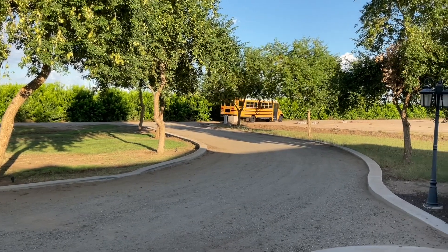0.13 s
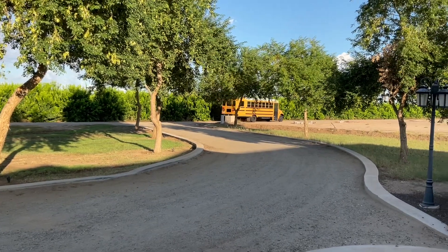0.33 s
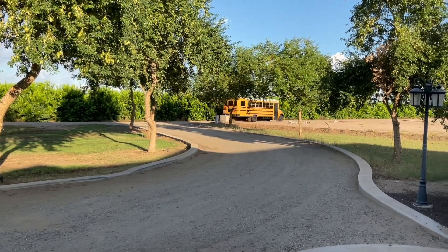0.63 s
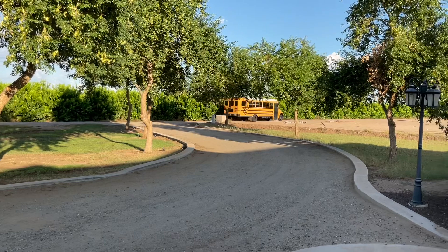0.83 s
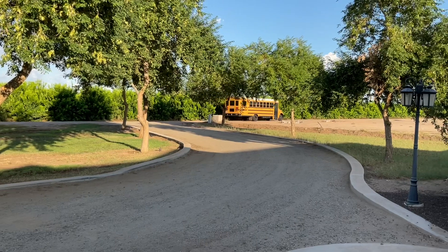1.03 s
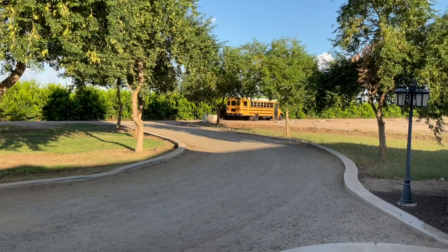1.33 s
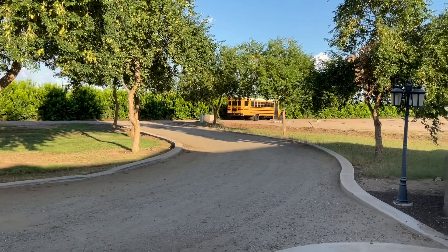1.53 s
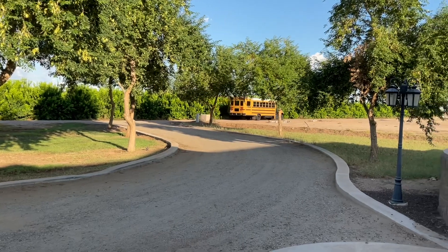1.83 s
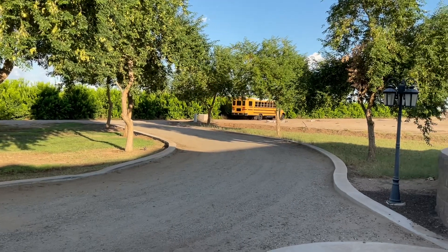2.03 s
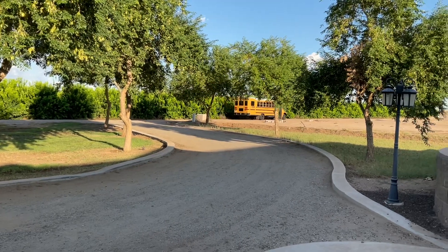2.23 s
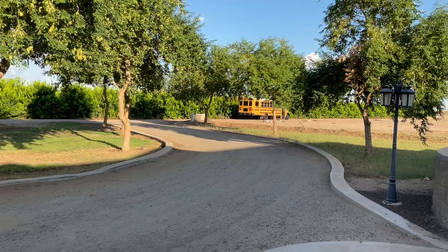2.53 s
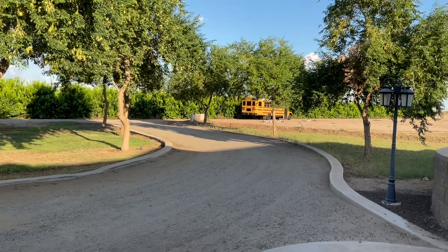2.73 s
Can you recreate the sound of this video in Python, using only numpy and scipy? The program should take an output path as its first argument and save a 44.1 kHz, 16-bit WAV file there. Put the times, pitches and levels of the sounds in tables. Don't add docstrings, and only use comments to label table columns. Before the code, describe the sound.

A diesel bus about sixty metres away drones with a deep, steady exhaust hum and soft pulsing fan and valve hiss. Pitch creeps up slightly until about 1 s, while the boom dips, then swells again around 1.4-1.7 s. Near 1.8 s the throttle lifts; pitch slides down by a third until 2.5 s and fades. A very faint high whistle falls too. Tiny rattling ticks and low outdoor rumble remain.

```python
import sys
import numpy as np
from scipy import signal
from scipy.fft import rfft, irfft, next_fast_len
from scipy.io import wavfile
from scipy.ndimage import uniform_filter1d

SR = 44100
rng = np.random.default_rng(int(sys.argv[2]) if len(sys.argv) > 2 else 0)


def field_ratio(decibels):
    return 10 ** (np.asarray(decibels, dtype=float) / 20)


def to_wav(sig):
    pcm = np.clip(np.atleast_2d(sig), -1, 1) * 32767
    pcm = np.round(pcm).astype(np.int16)
    wavfile.write(sys.argv[1], SR, pcm.T)


N = 127008

# time in seconds, firing rate in Hz, exhaust boom in dB,
# gain from distance in dB.
ENGINE_RUN = [(0, 75.55, -24.5, 1), (.2, 74.93, -26.5, 1), (.34, 76.42, -25.5, 0.5),
              (.62, 76.9, -32.5, 1.5), (.76, 78.48, -32, 1), (1.04, 79.4, -40, 0), (1.18, 78.1, -36.5, 0.5),
              (1.36, 77.6, -29, -1), (1.6, 75.57, -28, -2), (1.78, 75.5, -29, -2), (1.95, 68.34, -37, -2.5),
              (2.2, 59.14, -39.5, -4), (2.45, 51.2, -40, -4), (2.6, 50.56, -59.5, -6),
              (2.88, 50, -48, -4.5)]
# multiple of the firing rate, level in dB, loudest moment in seconds,
# spread around it in seconds.
ENGINE_ORDERS = [(1.5, -42.5, 1.6, 1.17), (2, -51, 0.55, 2.8), (2.5, -53, 0.23, 0.25),
                 (3.33, -51, 0.72, 0.38), (4.33, -57, 0.28, 0.56), (5.3, -48.5, 0.06, 0.11),
                 (8, -52.5, 1.459, 0.41), (8.05, -53.5, 0.82, 0.54), (8.5, -57.5, 0.1, 0.18),
                 (9.4, -50.5, 0.99, 0.33), (14.4, -56.5, 1.1, 0.17), (3.0, -51, 1.4, 0.15)]
# time in seconds, pitch in Hz, level in dB.
TURBO_WHISTLE = [
    (0, 12700, -81),
    (.55, 12900, -80),
    (.95, 13170, -81),
    (1.18, 13170, -81),
    (1.75, 11450, -77),
    (1.96, 10950, -83),
    (2.3, 9900, -89),
    (2.45, 9600, -110),
    (2.88, 9500, -120),
]
# frequency in Hz, density in dB per Hz.
HISS_COLOUR = [(300, -17), (700, 1.5), (1450, -6.5), (2500, -6.5), (4700, -15), (6900, -13), (8300, -30),
               (13000, -44)]
# frequency in Hz, width in Hz, level in dB.
COVER_RINGS = [(1145, 200, -59), (1870, 210, -65.5), (2927, 600, -59), (4200, 690, -63.5), (5700, 330, -66),
               (7000, 1300, -70.5)]
# frequency in Hz, density in dB per Hz.
RUMBLE_COLOUR = [(25, -34.5), (55, -8), (90, -5.5), (130, -6.5), (220, -14.5), (370, -14.5), (700, -27.5),
                 (9000, -89)]
# frequency in Hz, width in Hz, level in dB.
DISTANT_HUM = [(95.6, 5.5, -37.5), (118.8, 5.8, -50), (81.6, 26, -40), (179.5, 8.6, -53), (326, 49, -56.5),
               (408.8, 12, -63.5)]
# start in seconds, level in dB, centre in Hz, length in seconds.
LOOSE_TICKS = [(.5, -62, 6500, .01), (0.734, -58, 5700, .008), (1.34, -55, 5170, .008),
               (1.406, -52, 7000, 0.021), (1.67, -56.5, 4560, .015), (1.834, -62.5, 4200, .008),
               (1.9, -59.5, 3520, .012), (1.975, -71.5, 5060, 0.015), (2.455, -55.5, 6000, .015),
               (2.454, -77, 11160, 0.009), (2.623, -56.5, 7300, 0.013), (2.733, -64.5, 2540, 0.014)]
# frequency in Hz, lead of the left port in radians.
PORT_LEAD = [(170, 0), (310, -.45), (950, .5), (1300, -.6), (2420, -3.2), (3400, -6.2), (4150, -6.3),
             (12000, -11.3)]
# frequency in Hz, share of sound reaching both alike from 0 to 1.
PORT_LIKENESS = [(105, .999), (170, .96), (320, .6), (440, .8), (600, .55), (1200, .65), (1800, .93),
                 (7000, .9)]


def table(rows, col, at, log=False):
    r = np.array(rows, float)
    if log:
        return np.interp(np.log(at + 1), np.log(r[:, 0]), r[:, col])
    return np.interp(at, r[:, 0], r[:, col])


def level(x, db):
    return x * field_ratio(db) / np.sqrt(np.mean(x ** 2))


def walk(rate_hz):
    hold = int(SR / rate_hz)
    steps = rng.standard_normal(400)[np.arange(N) // hold % 400]
    return 1.3 * uniform_filter1d(uniform_filter1d(steps, hold), hold)


def band(hz, width):
    f = np.fft.rfftfreq(N, 1 / SR)
    resonance = 1 / (1 + ((f - hz) / width * 2) ** 2)
    return level(irfft(rfft(rng.standard_normal(N)) * resonance, N), 0)


def noise(colour, swell_db, flicker_db, air_db=0):
    f = np.fft.rfftfreq(N, 1 / SR)
    swell = walk(5.77)
    spectrum = rfft(rng.standard_normal(N)) * field_ratio(table(colour, 1, f, True))
    octave = np.log2(f / 30 + 1e-9)
    out = 0
    for k in range(10):
        part = irfft(spectrum * np.clip(1 - abs(octave - k), 0, 1), N)
        air = air_db * (k / 9) ** 6
        out = out + part * field_ratio(swell_db * swell + flicker_db * walk(9.0) + air)
    return level(out, 0)


def exhaust_boom(t, turns):
    sway_db = 0.74 * walk(21.0)
    return np.sqrt(2) * field_ratio(table(ENGINE_RUN, 2, t) + sway_db) * np.sin(2 * np.pi * turns)


def weaker_orders(t, turns):
    lift_off_s, ramp_s, drop_db = 1.75, 0.3, -9
    total = 0
    for multiple, db, loudest, spread in ENGINE_ORDERS:
        sway = field_ratio(db + 0.5 * walk(4.6))
        phase = multiple * turns + rng.random() + 0.18 * walk(9.0)
        heard = np.exp(-((t - loudest) / spread) ** 2)
        total = total + np.sqrt(2) * sway * np.sin(2 * np.pi * phase) * heard
    return total * field_ratio(drop_db * np.clip((t - lift_off_s) / ramp_s, 0, 1))


def clatter_hiss(t, turns):
    depth, sharpness = 0.26, 6.6
    cycle = turns / 6 + 0.15 * walk(3.0)
    pulse = 1 + depth * (0.5 + 0.5 * np.cos(2 * np.pi * cycle)) ** sharpness
    air_db = 0.9 * table(ENGINE_RUN, 3, t)
    hiss = level(noise(HISS_COLOUR, swell_db=0.44, flicker_db=0.34, air_db=air_db) * pulse, -45)
    covers = sum(field_ratio(db + 2.5 * walk(18.0)) * band(hz, width) for hz, width, db in COVER_RINGS)
    return hiss + pulse * covers


def engine(t):
    turns = np.cumsum(table(ENGINE_RUN, 1, t)) / SR
    far = field_ratio(table(ENGINE_RUN, 3, t))
    return exhaust_boom(t, turns) + far * (weaker_orders(t, turns) + clatter_hiss(t, turns))


def turbo(t):
    rough = band(0, 220)
    turns = np.cumsum(table(TURBO_WHISTLE, 1, t)) / SR
    return np.sqrt(2) * field_ratio(table(TURBO_WHISTLE, 2, t)) * rough * np.cos(2 * np.pi * turns)


def surroundings(t):
    rumble = level(noise(RUMBLE_COLOUR, swell_db=0.3, flicker_db=0.5), -39.5)
    fade = field_ratio(0.58 * table(ENGINE_RUN, 3, t))
    return rumble * fade + sum(field_ratio(db) * band(hz, width) for hz, width, db in DISTANT_HUM)


def ticks(t):
    total = 0
    for start, db, hz, length in LOOSE_TICKS:
        ring = band(hz, 0.1 * hz) + 0.35 * band(hz, 0.5 * hz)
        total = total + field_ratio(db) * ring * np.exp(-((t - start - length / 2) / length) ** 2)
    return total


def two_ports(mono):
    margin = 8192
    mono = np.pad(mono, margin, "reflect")
    n = next_fast_len(len(mono))
    f = np.fft.rfftfreq(n, 1 / SR)
    tail = rng.standard_normal(8192) * np.exp(-np.arange(8192) / SR / 0.06)
    scatter = rfft(tail, n)
    scatter = scatter / (abs(scatter) + 1e-9)
    alike = np.clip(table(PORT_LIKENESS, 1, f, True), 0, 1)
    alike = 1 - (1 - alike) * (1 - np.exp(-((f - 3800) / 480) ** 6))
    lead = np.exp(0.5j * table(PORT_LEAD, 1, f))
    same = np.sqrt((1 + alike) / 2)
    other = np.sqrt((1 - alike) / 2) * scatter
    spectrum = rfft(mono, n)
    left = irfft(spectrum * (same + other) * lead, n)
    right = irfft(spectrum * (same - other) / lead, n)
    return np.array([left, right])[:, margin:margin + N]


def scene():
    t = np.arange(N) / SR
    return two_ports(engine(t) + turbo(t) + surroundings(t) + ticks(t))


def roll_off(x):
    return signal.sosfilt(signal.butter(12, 14400, fs=SR, output="sos"), x)


def record(dry):
    low_cut = signal.butter(2, 22, "high", fs=SR, output="sos")
    top_cut = signal.cheby1(8, 1, 13500, fs=SR, output="sos")
    fade_in = np.minimum(np.arange(N) / 96, 1)
    mix = signal.sosfilt(top_cut, signal.sosfilt(low_cut, dry) * fade_in)
    return roll_off(mix)


dry = scene()
out = record(dry)
to_wav(out)
```